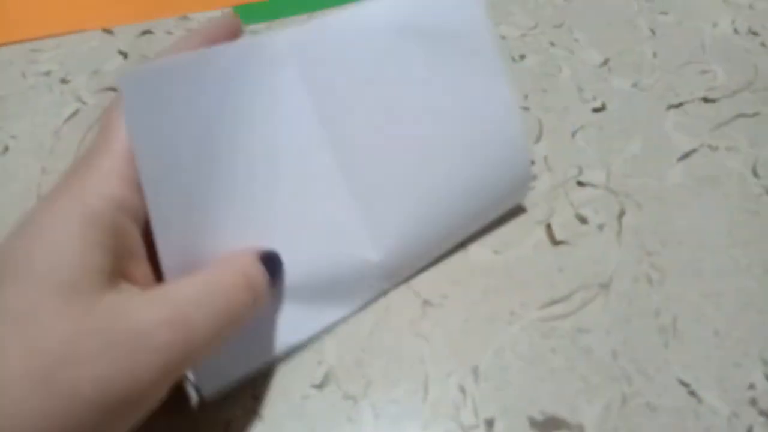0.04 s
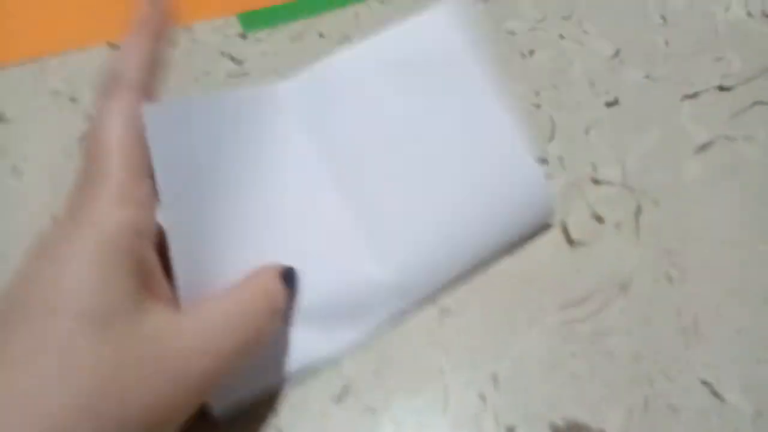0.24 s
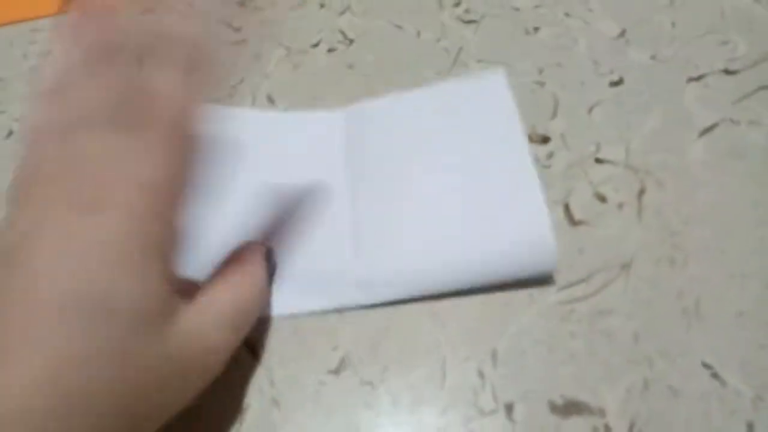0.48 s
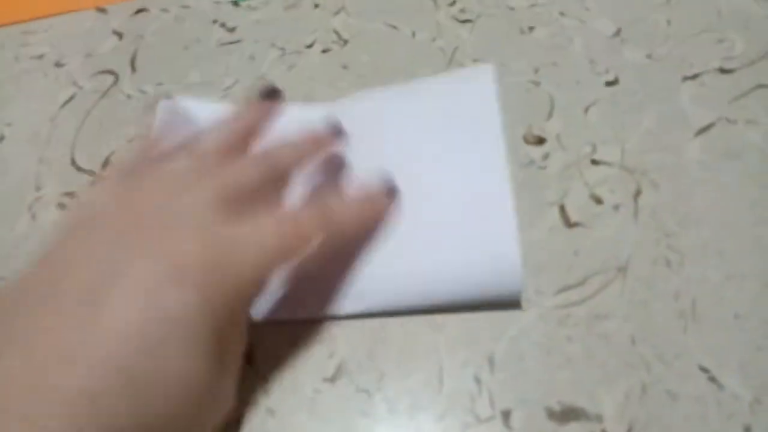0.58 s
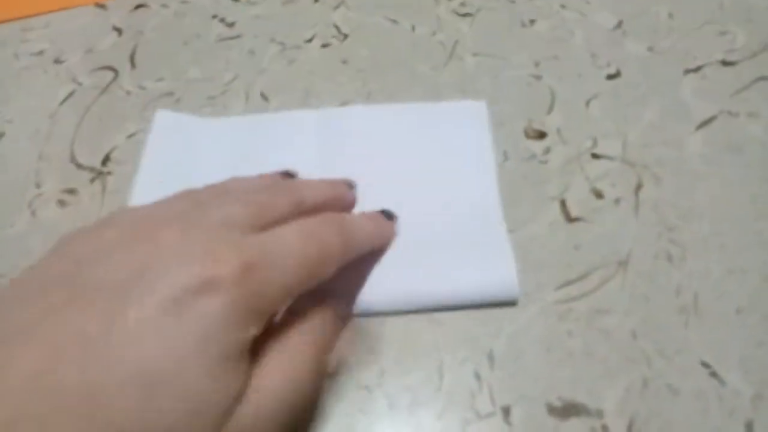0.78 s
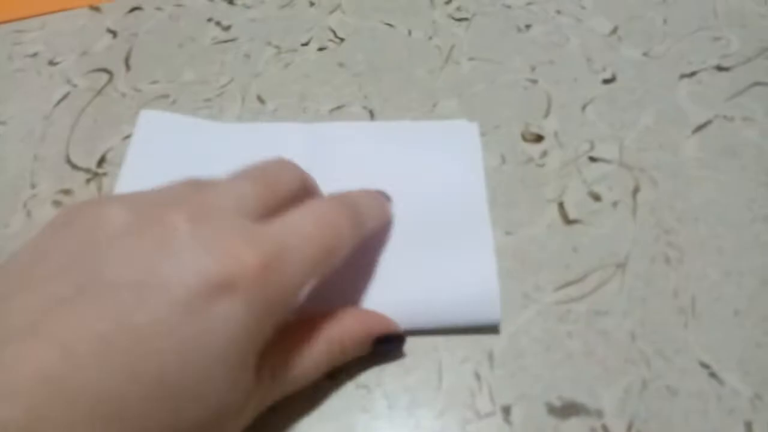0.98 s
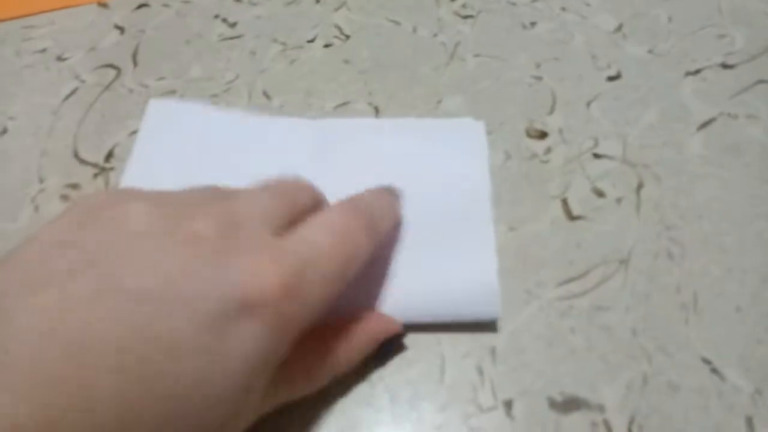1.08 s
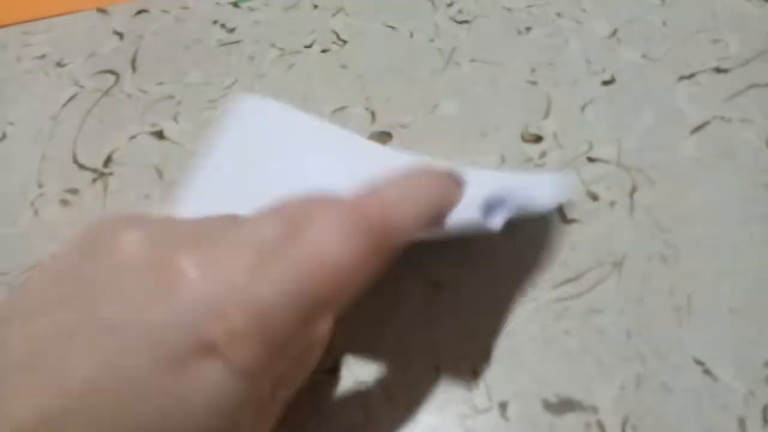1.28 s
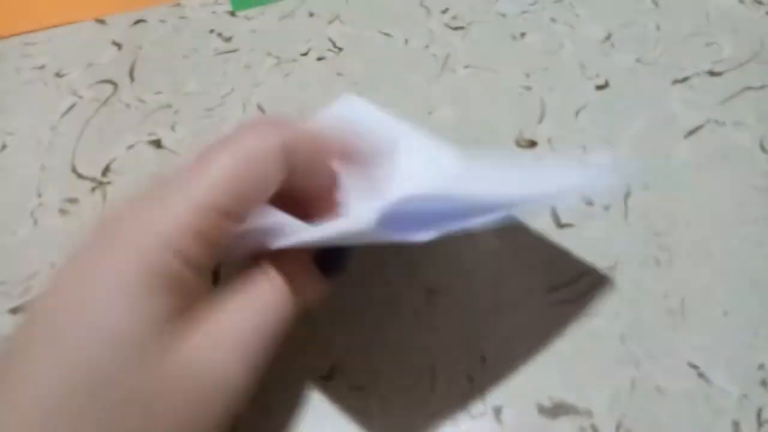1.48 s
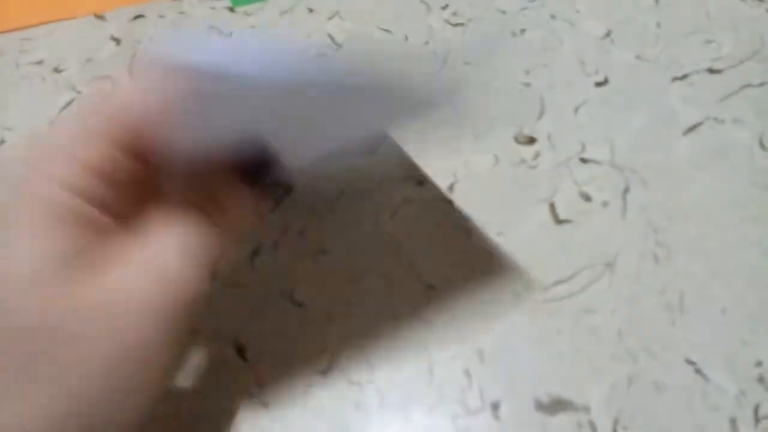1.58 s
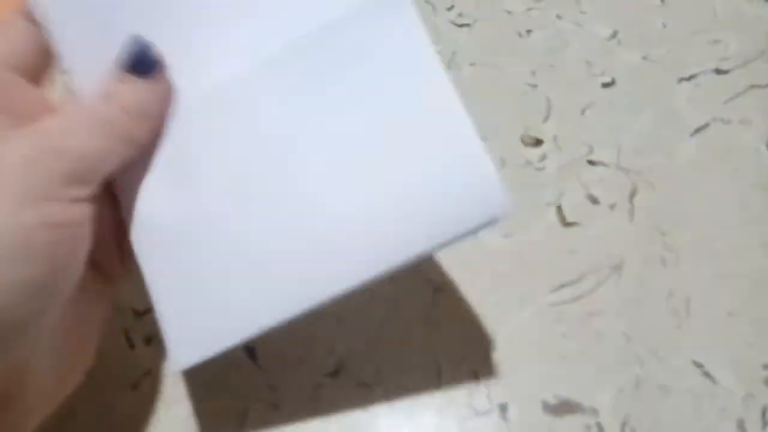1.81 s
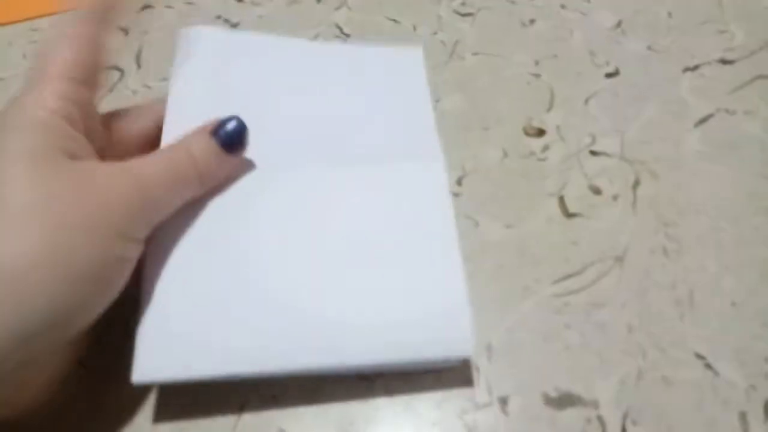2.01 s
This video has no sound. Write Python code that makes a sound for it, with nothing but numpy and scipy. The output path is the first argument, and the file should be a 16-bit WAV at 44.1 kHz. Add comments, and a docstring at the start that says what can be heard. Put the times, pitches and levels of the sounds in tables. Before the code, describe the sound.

Close, dry paper handling in a quiet room with faint low hum. The sheet snaps and crinkles early, calms to faint rubs and dull hand pats, then crackles again as it is lifted and opened.

```python
"""At a stone table in a quiet room, layered sheets of paper are folded by hand close to a small microphone.
The sheet buckles with one sharp crack, crinkles as it is laid over, is pressed and creased, then lifted and opened.
Crack and pats are damped sines; kinks are dispersed clicks; crunches, slides and a very high, fine hiss are
streams of tiny slips. Narrow noise gives a faint rising hollow tone; shaped noise and a wavering tone give
the soft room noise and low hum."""
import sys
import numpy as np
from scipy import signal
from scipy.fft import rfft, irfft
from scipy.io import wavfile

SR = 44100
rng = np.random.default_rng(int(sys.argv[2]) if len(sys.argv) > 2 else 0)


def transcribe(signal):
    """Save signal, clipped to [-1, 1], as a 16-bit WAV file at the path in sys.argv[1]."""
    frames = np.atleast_2d(signal).T
    limited = np.clip(frames, -1, 1)
    pcm = np.round(limited * 32767).astype(np.int16)
    wavfile.write(sys.argv[1], SR, pcm)


N = 90404

# Ring of the buckling sheet. Each row: frequency [Hz], envelope peak [dB], swell time [s].
CRACK_RINGS = [(300, -25.5, 0.0029), (638, -30.5, 0.0019), (800, -18.5, 0.00089), (1500, -16, 0.0006),
               (2200, -24, 0.001), (3200, -24.5, 0.00072), (4200, -18, 0.00042), (5520, -16.5, 0.00019),
               (10840, -13.5, 0.000078)]
CRACK_START_S, CRACK_BEND_DELAY_AT_1KHZ_S = 0.2352, 0.000647

# Single kinks snapping. Each row: click time [s], level [dB], ring of the nearby panel [Hz],
# bass [dB], treble [dB].
KINK_SNAPS = [(0.0506, -15.5, 1300, -5, -51), (0.2198, -16.5, 1870, 4, -14), (0.243, -19.5, 3700, -18, -13),
              (0.2533, -10.5, 5560, -3.5, 2.5), (0.2526, -13.5, 1150, -1, -20),
              (0.2601, -16, 1400, 12, -32), (0.2676, -18, 1070, 0, -22), (0.3362, -23, 1980, 8.5, -9),
              (0.3731, -15.5, 1630, 0.5, -30), (0.3831, -14, 1920, -3, -17),
              (0.3893, -10.5, 1690, -13, -12), (0.4076, -7, 1780, -5, -5), (.4090, -11.5, 1500, 10, 2),
              (0.4135, -8, 1950, -8, -24), (0.4156, -5.5, 2140, -5.5, -17), (0.423, -20, 1710, -12, -12),
              (.5055, -18, 2900, -7, -11.5), (0.538, -26.5, 3040, -22, -6), (0.6746, -30, 3200, -4, -2),
              (.6977, -30, 2270, -8, 6), (0.7134, -27, 2200, -29, -3), (.7600, -30.5, 2900, 1, 5),
              (0.7741, -24, 1630, -6, -13), (1.2368, -12.5, 3030, -21, -12),
              (1.2560, -8.5, 2200, -34, -9.5), (1.418, -24, 1610, -27, -12), (1.4230, -21.5, 1870, -2, -25),
              (1.4396, -24, 1500, 7, -20), (1.447, -25, 1400, 6, -7), (1.581, -13.5, 2900, -9, -11),
              (1.5858, -19, 1500, 1, -14), (1.709, -18.5, 1500, -5, -13), (1.711, -21.5, 3000, -12, 1),
              (1.7225, -19, 1570, 5.5, -11), (1.739, -25.5, 3800, -15, 4), (1.7605, -19, 1290, 6, -4),
              (1.7761, -12.5, 970, 2, -3.5), (1.7791, -15.5, 1250, -9, 1)]
KINK_BEND_DELAY_AT_1KHZ_S = 0.000983  # travel time of the bending wave to the edge
KINK_STRAIN_T60_S, KINK_SCATTER_T60_S = 0.008, 0.013

# Fibres giving way along a fold. Each row: start [s], length [s], level [dB], panel ring [Hz],
# bass [dB], treble [dB].
CRUNCH_RUNS = [(.2302, 0.0099, -32.5, 970, 15.5, 2), (.384, 0.011, -45, 1800, -14, -27),
               (.397, 0.018, -35.5, 2660, -2, -7), (.409, 0.026, -37, 1870, -3.5, -12),
               (.461, 0.012, -45, 6500, -2, 1.5), (.5355, 0.01, -44, 3340, -14, -15),
               (.585, 0.011, -58, 3600, -15, -5), (.766, 0.019, -42.5, 1630, 9, -8),
               (1.013, 0.02, -48, 2900, -38, -2.5), (1.039, .019, -44.5, 2900, -37, -3.5),
               (1.2275, 0.021, -39, 3340, -36, -0.5), (1.234, 0.025, -46, 2450, -29, -11),
               (1.326, 0.025, -46.5, 3370, -15, 5.5), (1.419, 0.018, -41.5, 1700, 5, -14),
               (1.433, 0.023, -43.5, 1500, 6, -4), (1.565, .013, -45, 2100, -11, -2),
               (1.777, 0.017, -41, 1150, 4.5, -23), (1.887, 0.013, -49, 890, 3, -27)]
CRUNCH_RISE_S, CRUNCH_FALL_S, CRUNCH_SLIPS_PER_S = 0.001, 0.0083, 4300
CRUNCH_SPREAD_DB, CRUNCH_CLUMP_DB = 2, 3

# Skin and paper sliding. Each row: start [s], length [s], level [dB], panel ring [Hz],
# bass [dB], treble [dB].
SLIDE_STROKES = [(-.02, .08, -55, 2200, 0.5, -9), (.045, .075, -51, 1980, -5, -3.5),
                 (.095, 0.072, -52, 2320, 4, 2), (.15, 0.15, -57.5, 1990, 8.5, -9),
                 (.24, 0.042, -51, 1000, -3, -4), (.295, 0.083, -51.5, 1660, 7.5, 6.5),
                 (.37, 0.12, -44.5, 2120, 1, 2.5), (.47, 0.084, -52, 1730, 3, -7),
                 (.58, 0.056, -53, 3500, -5.5, -1), (.69, .12, -57.5, 3200, 4.5, -2.5),
                 (.795, 0.072, -63, 3460, 12.5, -7), (.965, 0.05, -64.5, 3500, 10.5, 12),
                 (1.235, 0.06, -48.5, 2860, 1.5, 0.5), (1.297, 0.14, -52.5, 3380, -2, 4),
                 (1.425, 0.07, -47, 910, 2.5, -2), (1.483, .055, -45, 3230, 3, -2),
                 (1.53, .11, -53, 1500, -0.5, 0.5), (1.575, 0.069, -52, 1540, 11.5, 2),
                 (1.635, 0.15, -52.5, 1760, 7, 3), (1.77, .085, -50, 4540, 7, 0.5),
                 (1.84, 0.095, -59.5, 1000, 4.5, 0), (1.915, 0.14, -62.5, 3270, -15, 12)]
SLIDE_RISE_S, SLIDE_FALL_S, SLIDE_SLIPS_PER_S = 0.01, 0.018, 11000
SLIDE_SPREAD_DB, SLIDE_CLUMP_DB = -1.5, -0.4  # negative spread: the rarer slips are smaller
CLUMP_SPACING_S = 0.00418  # for crunches, slides and hiss

# Very high, fine hiss over the crunch. Each row: start [s], length [s], level [dB].
HISS_BURSTS = [(1.222, 0.061, -38.5)]
# Colour of the fine hiss. Each row: frequency [Hz], gain [dB].
HISS_SPECTRUM = [(3000, -53), (7000, -9), (10000, -12), (15000, 3)]

# Fingers and palm meeting the paper. Each row: start [s], envelope peak [dB], frequency [Hz].
HAND_PATS = [(.14, -46.5, 200), (.305, -39.5, 233), (0.319, -40.5, 129), (.4075, -33, 405),
             (0.811, -46.5, 248), (0.84, -52, 343), (.918, -42, 196), (1.457, -45, 216), (1.58, -39.5, 170),
             (1.664, -38.5, 194), (1.878, -45, 318)]
PAT_SWELL_S = 0.0018

# Faint hollow tone, likely the air pocket under the moving sheet. Each row: start [s], length [s],
# level [dB], first frequency [Hz], last frequency [Hz].
POCKET_TONES = [(0.809, .13, -64.5, 393, 450.5), (1.229, .12, -66, 300, 408)]
POCKET_HALF_WIDTH_HZ = 21

# Colour of the paper when it snaps. Each row: frequency [Hz], gain [dB].
SNAP_SPECTRUM = [(50, -41), (180, -5.5), (340, 3.5), (600, -3), (1000, -1), (1550, 0.5), (2300, -2),
                 (3200, -1), (4500, -1), (7000, -6)]
# Colour of the paper when it slides. Each row: frequency [Hz], gain [dB].
RUB_SPECTRUM = [(60, -15.5), (180, -4.5), (340, 3.5), (650, -5.5), (1000, -3), (1600, 1.5), (2400, -2.5),
                (3400, -0.5), (4600, -4), (7000, -8.5)]
PANEL_RING_DB, PANEL_RING_OCTAVES = 7, 0.34
BASS_HZ, MID_LOW_HZ, MID_HIGH_HZ, TREBLE_HZ = 650, 1400, 2900, 5600
TABLE_ECHO_GAIN, TABLE_ECHO_MAX_S = 0.15, 0.0011  # bounce off the table top

ROOM_DB, ROOM_T60_S = -20, 0.24
# Relative spectrum of the room noise. Each row: frequency [Hz], level [dB].
AIR_SPECTRUM = [(25, -18), (50, -6), (80, 0.5), (120, 8), (160, -1), (205, -1), (260, -8), (330, -10),
                (650, -17.5), (1100, -17.5), (1900, -14.5), (3300, -12), (5000, -15), (7000, -25.5),
                (10000, -17.5), (15000, -14.5)]
AIR_RMS_DB = -55.5
# Low hum, which swells and sinks. Each row: time [s], level [dB].
HUM_SWELL = [(0, -50), (.15, -59), (.3, -56.5), (.48, -72), (.56, -75), (.65, -86), (.72, -61), (.85, -61),
             (1.0, -54.5), (1.1, -66), (1.22, -84), (1.33, -60), (1.5, -52.5), (1.7, -59), (1.95, -56.5),
             (2.05, -62.5)]
HUM_HZ, HUM_WAVER = 119.3, 0.75  # waver is relative to the steady tone

# Microphone colour. Each row: frequency [Hz], gain [dB].
MIC_SPECTRUM = [(20, 2), (4200, 2.5), (5200, 0), (6400, 9.5), (7200, 5.5), (8100, -11.5), (9500, -18.5),
                (11500, -22), (13600, -28), (15300, -13), (16200, -28)]
BAND_EDGE_HZ = 16300


def crack(panel_cut_hz=150):
    """The sheet snaps through; bending waves bring the treble first and the low panel ring last."""
    out, t = np.zeros(N), np.arange(SR // 20) / SR
    for hz, db, swell_s in CRACK_RINGS:
        delay = CRACK_BEND_DELAY_AT_1KHZ_S * np.sqrt(1000 / hz)
        age = np.maximum(t - delay, 0)
        envelope = age / swell_s * np.exp(1 - age / swell_s)
        add(out, CRACK_START_S, amp(db) * envelope * np.sin(2 * np.pi * hz * age))
    high_pass = signal.butter(2, panel_cut_hz, "high", fs=SR, output="sos")
    return signal.sosfilt(high_pass, out)


def kinks(scatter_db=-2, soft_hz=7500):
    """Fibres strain for an instant, the kink clicks, and the click scatters through the layers."""
    out, t = np.zeros(N), np.arange(-SR // 100, SR // 25) / SR
    for s, db, *spot in KINK_SNAPS:
        decay = amp(-60 * np.maximum(t / KINK_SCATTER_T60_S, -t / KINK_STRAIN_T60_S))
        scatter = rng.standard_normal(len(t)) * decay
        click = amp(scatter_db) * scatter / np.linalg.norm(scatter) + (t == 0)
        snap = signal.fftconvolve(click, paper(SNAP_SPECTRUM, *spot))
        add(out, s + t[0], amp(db) * dispersed(snap))
    low_pass = signal.butter(1, soft_hz, fs=SR, output="sos")
    return signal.sosfilt(low_pass, out)


def dispersed(x):
    """Bending waves in paper travel faster at high pitch, so a click leaves as a tiny falling chirp."""
    hz = np.fft.rfftfreq(len(x), 1 / SR)
    phase = -4 * np.pi * KINK_BEND_DELAY_AT_1KHZ_S * np.sqrt(1000 * hz)
    return irfft(rfft(x) * np.exp(1j * phase), len(x))


def crunches():
    """Fibres give way along a fold in short, clumped runs of slips."""
    return friction(CRUNCH_RUNS, SNAP_SPECTRUM, CRUNCH_RISE_S, CRUNCH_FALL_S,
                    CRUNCH_SLIPS_PER_S, CRUNCH_SPREAD_DB, CRUNCH_CLUMP_DB)


def slides():
    """Skin and paper rub in longer, denser streams of slips."""
    return friction(SLIDE_STROKES, RUB_SPECTRUM, SLIDE_RISE_S, SLIDE_FALL_S,
                    SLIDE_SLIPS_PER_S, SLIDE_SPREAD_DB, SLIDE_CLUMP_DB)


def friction(rows, colour, *texture):
    """Streams of slips sound through the sheet."""
    out = np.zeros(N)
    for s, length_s, db, *spot in rows:
        slips = grains(length_s, *texture)
        add(out, s, amp(db) * signal.fftconvolve(slips, paper(colour, *spot)))
    return out


def grains(length_s, rise_s, fall_s, per_s, spread_db, clump_db):
    """Tiny slips of uneven size come in clumps under an attack, hold and release."""
    t = np.arange(0, length_s, 1 / SR)
    chance, size, sign = rng.random((3, SR // 4))[:, :len(t)]
    clumps = np.interp(t / CLUMP_SPACING_S, np.arange(SR // 100), rng.standard_normal(SR // 100))
    size_steps = np.minimum(-np.log(size + 1e-9), 3)  # exponential draw, capped
    sizes = amp(spread_db * size_steps + clump_db * clumps)
    slips = (chance < per_s / SR) * np.sign(sign - 0.5) * sizes
    attack = np.minimum(t / rise_s, 1)
    release = np.minimum((length_s - t) / fall_s, 1)
    return unit(slips) * attack * release


def paper(colour, ring_hz, bass_db, treble_db):
    """The nearby panel rings broadly, a wide panel adds bass, a tight spot treble; the table echoes it."""
    hz = bins()
    octaves = np.log2((hz + 1) / ring_hz)
    ring = PANEL_RING_DB * np.exp(-0.5 * (octaves / PANEL_RING_OCTAVES) ** 2)
    db = read(colour, hz) + ring
    shelves = read([(BASS_HZ, bass_db), (MID_LOW_HZ, 0), (MID_HIGH_HZ, 0), (TREBLE_HZ, treble_db)], hz)
    direct = causal(db + shelves) / np.sqrt(np.mean(amp(db) ** 2))  # shelves do alter the level
    out = direct.copy()
    add(out, TABLE_ECHO_MAX_S * rng.uniform(0.5, 1), TABLE_ECHO_GAIN * direct)
    return out


def hiss(fall_s=0.038):
    """Dense slips, filtered to the top of the range, give a very high, fine hiss fading along its length."""
    out = np.zeros(N)
    for s, length_s, db in HISS_BURSTS:
        slips = grains(length_s, CRUNCH_RISE_S, fall_s, SLIDE_SLIPS_PER_S, SLIDE_SPREAD_DB, SLIDE_CLUMP_DB)
        burst = signal.fftconvolve(slips, causal(read(HISS_SPECTRUM, bins())))
        add(out, s, amp(db) * burst)
    return out


def pats():
    """Soft, quickly damped thumps of the hand."""
    out, t = np.zeros(N), np.arange(SR // 15) / SR
    envelope = t / PAT_SWELL_S * np.exp(1 - t / PAT_SWELL_S)
    for s, db, hz in HAND_PATS:
        add(out, s, amp(db) * envelope * np.sin(2 * np.pi * hz * t))
    return out


def pockets():
    """Rubbing excites a narrow resonance that rises as the gap changes."""
    out = np.zeros(N)
    low_pass = signal.butter(2, POCKET_HALF_WIDTH_HZ, fs=SR, output="sos")
    for s, length_s, db, first_hz, last_hz in POCKET_TONES:
        u = np.arange(0, length_s, 1 / SR) / length_s
        slow = unit(signal.sosfilt(low_pass, rng.standard_normal((2, SR))))[:, -len(u):]
        hz = first_hz + (last_hz - first_hz) * u
        carrier = np.exp(2j * np.pi * np.cumsum(hz) / SR)
        tone = ((slow[0] + 1j * slow[1]) * carrier).real
        add(out, s, amp(db) * np.sqrt(np.sin(np.pi * u)) * tone)
    return out


def room(x, onset_s=0.015):
    """The walls return a faint, short tail of decaying noise."""
    t = np.arange(SR // 2) / SR
    decay = amp(-60 * t / ROOM_T60_S) * np.minimum(t / onset_s, 1)
    tail = rng.standard_normal(len(t)) * decay
    return amp(ROOM_DB) * signal.fftconvolve(x, tail / np.linalg.norm(tail))[:N]


def background(waver_hz=18):
    """Steady shaped noise fills the room beside a hum that slow noise makes waver."""
    hz, t = np.fft.rfftfreq(N, 1 / SR), np.arange(N) / SR

    def noise(gain):
        return unit(irfft(rfft(rng.standard_normal(N)) * gain, N))

    air = noise(amp(read(AIR_SPECTRUM, hz)))
    slow_gain = np.exp(-(hz / waver_hz) ** 2)
    waver = noise(slow_gain) + 1j * noise(slow_gain)
    hum = ((1 + HUM_WAVER * waver) * np.exp(2j * np.pi * HUM_HZ * t)).real
    hum_level = amp(np.interp(t, *np.transpose(HUM_SWELL)))
    return amp(AIR_RMS_DB) * air + hum_level * unit(hum)


def amp(db):
    """Converts dB to amplitude."""
    return 10 ** (np.asarray(db) / 20)


def unit(x):
    """Scales to an rms of one."""
    return x / np.sqrt(np.mean(x ** 2) + 1e-20)


def read(points, hz):
    """Reads a spectrum in dB on a log-frequency axis."""
    f, db = np.transpose(points)
    return np.interp(np.log(hz + 1), np.log(f + 1), db)


def add(mix, s, sound):
    """Mixes a sound in at time s, cutting what falls outside."""
    at = round(s * SR)
    sound = sound[max(-at, 0):]
    part = mix[max(at, 0):][:len(sound)]
    part += sound[:len(part)]


def bins(size=2048):
    """Frequency axis of the filters in Hz."""
    return abs(np.fft.fftfreq(size, 1 / SR))


def causal(db):
    """Shortest causal (minimum-phase) impulse response with this spectrum."""
    log_spectrum = np.conj(signal.hilbert(np.log(amp(db))))
    return np.fft.ifft(np.exp(log_spectrum)).real


def scene():
    """All paper and hand sounds in the room, over the background."""
    near = crack() + kinks() + crunches() + slides() + hiss() + pats() + pockets()
    return (near + room(near) + background())[None]


def record(dry):
    """Microphone colour, then the band limit."""
    coloured = signal.fftconvolve(dry, causal(read(MIC_SPECTRUM, bins()))[None], axes=1)[:, :N]
    band_limit = signal.firwin(255, BAND_EDGE_HZ, window=("kaiser", 9), fs=SR)
    return signal.oaconvolve(coloured, band_limit[None], "same")


dry = scene()
out = record(dry)
transcribe(out)
```